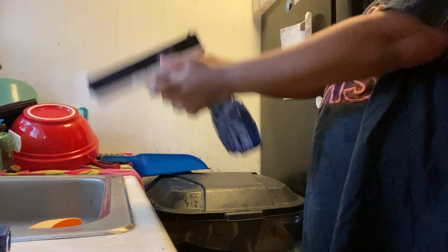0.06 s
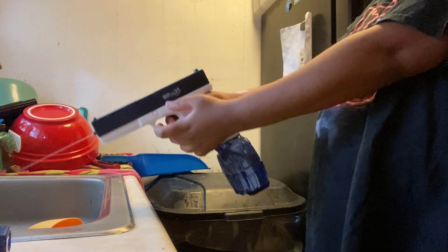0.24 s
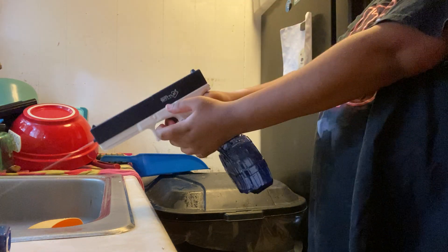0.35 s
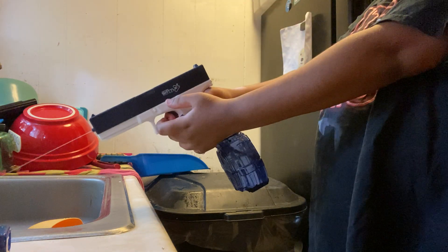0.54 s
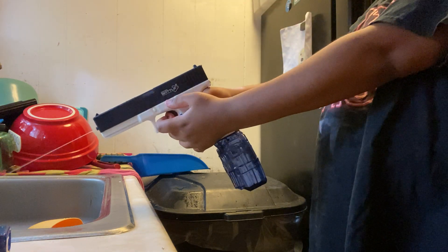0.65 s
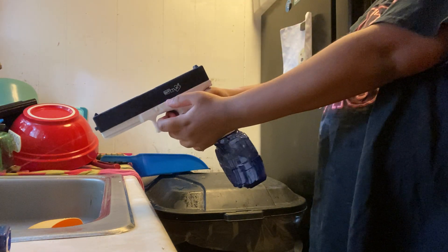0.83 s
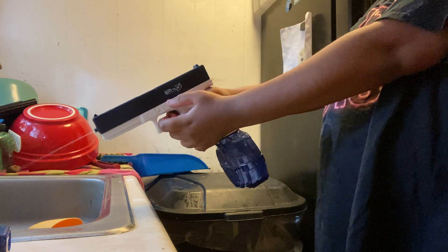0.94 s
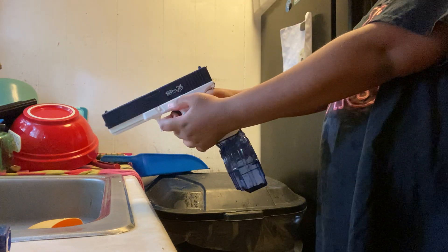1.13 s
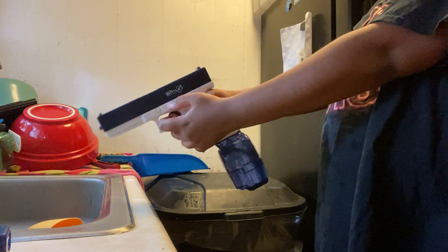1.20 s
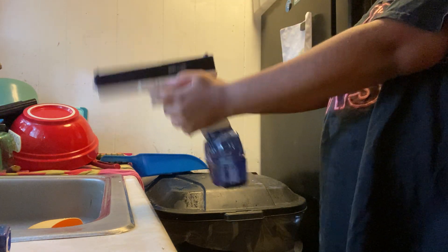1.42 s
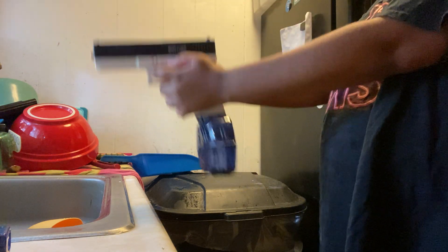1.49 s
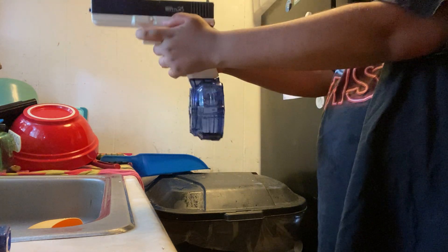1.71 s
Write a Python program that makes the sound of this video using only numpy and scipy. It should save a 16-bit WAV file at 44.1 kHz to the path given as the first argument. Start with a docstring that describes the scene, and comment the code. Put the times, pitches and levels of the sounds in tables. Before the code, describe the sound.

A motorised water pistol clicks, spins up and fires one short burst, its gears whining as rapid thumping spits of spray hit a steel sink. The motor winds down and a drop falls, close by in a small kitchen.

```python
"""A battery water pistol fires one burst into a steel kitchen sink.
The trigger clicks and the motor spins up; its gears whine and chatter, sagging as they cock the spring.
Fourteen times a second the piston lets go with a thump and a spit of spray that excites the sink's modes.
The motor coasts down, the hand shifts on the plastic, a last drop falls,
and the small hard room reverberates over a faint hum."""
import sys
import numpy as np
from scipy import signal
from scipy.fft import rfft, irfft
from scipy.io import wavfile
from scipy.ndimage import uniform_filter1d

SR = 44100
rng = np.random.default_rng(int(sys.argv[2]) if len(sys.argv) > 2 else 0)


def to_wav(s):
    """Save 16-bit WAV."""
    ch = np.atleast_2d(s).T  # columns
    pcm = np.round(np.clip(ch, -1, 1) * 32767)  # PCM
    wavfile.write(sys.argv[1], SR, pcm.astype(np.int16))


N = 77175
TIME_S = np.arange(N) / SR


def undb(db):
    """Decibels to amplitude ratio."""
    return 10 ** (np.asarray(db) / 20)

def unit(x):
    """Normalisation to rms 1."""
    return x / np.sqrt(np.mean(x ** 2))

def per_bin(points):
    """Interpolation of (frequency_hz, value) rows on a log frequency axis."""
    hz, value = np.array(points, float).T
    return np.interp(np.log(np.arange(N + 1) * SR / (2 * N) + 1), np.log(hz), value)

def colour(x, spectrum):
    """Minimum-phase filtering to a spectral shape, at unit power gain."""
    cepstrum = irfft(np.log(unit(undb(per_bin(spectrum)))))
    cepstrum[1:N] *= 2
    cepstrum[N + 1:] = 0
    return irfft(rfft(x, 2 * N) * np.exp(rfft(cepstrum)))[..., :N]

def wander(rate_hz):
    """Smooth random modulation, rms 1."""
    step = int(SR / rate_hz)
    return unit(uniform_filter1d(np.repeat(rng.standard_normal(N // step + 1), step), step)[:N])

def grains(spread_db):
    """Granular noise: dense tiny impacts of uneven size, rms 1."""
    size = np.repeat(np.minimum(rng.exponential(size=N // 8 + 1), 5), 8)[:N]
    return unit(rng.standard_normal(N) * undb(spread_db * size))

def ring(x, hz, t60_s):
    """Forced response of one damped mode, keeping the power of a noisy drive."""
    r = np.exp(-np.log(1000) / (t60_s * SR))
    return signal.lfilter([np.sqrt(2 * (1 - r * r))], [1, -r * np.exp(2j * np.pi * hz / SR)], x).real


# room air spectrum: frequency_hz, density_db
AIR_SPECTRUM = [(20, -13.5), (45, -0.5), (80, 2), (130, -6.5), (200, -13.5), (400, -5.5), (650, -4.5),
                (1000, -7.5), (1500, -9), (2000, -21.5), (2700, -15.5), (3600, -26), (6000, -33),
                (15000, -42)]

def background(air_db=-61, hum_hz=64.4, hum_db=-62.5):
    """Ambient noise: room air and a wavering appliance hum, as mid and side signals."""
    mid, side = undb(air_db) * colour(rng.standard_normal((2, N)), AIR_SPECTRUM)
    pitch_hz = hum_hz * (1 + .03 * wander(12))
    hum = np.sin(2 * np.pi * np.cumsum(pitch_hz) / SR) * undb(hum_db + 2.5 * wander(10))
    return mid + hum, side

def kitchen(x, early_db, early_decay_s=.0039, tail_db=-6, t60_s=.6, treble_t60_s=.33):
    """Reverberation: early reflections off counter and wall, then a tail that loses its treble first."""
    early, low, high = rng.standard_normal((3, N))
    unit_energy = lambda h: h / np.sqrt(np.sum(h ** 2))
    crossover = signal.butter(2, 4500, fs=SR)
    low = signal.filtfilt(*crossover, low) * 1000 ** (-TIME_S / t60_s)
    high = (high - signal.filtfilt(*crossover, high)) * 1000 ** (-TIME_S / treble_t60_s)
    early = unit_energy(early * np.exp(-TIME_S / early_decay_s))
    tail = unit_energy((low + high) * (TIME_S > .006))
    return signal.fftconvolve(x, undb(early_db) * early + undb(tail_db) * tail)[:N]

# likeness of the two channels: frequency_hz, likeness_ratio
COHERENCE = [(100, 0.89), (280, 0.91), (600, 0.26), (1200, 0.48), (2200, .1), (4500, 0.28), (6500, 0.55),
             (8000, 0.94), (15000, 1)]
# level difference: frequency_hz, left_minus_right_db
BALANCE = [(100, 2.5), (450, 2.5), (900, 1), (1300, 0), (1800, -4), (2900, -2), (3700, -1), (4900, 2.5),
           (7000, 0), (15000, -0.5)]
# phase difference: frequency_hz, left_lead_rad
PHASE_LEAD = [(100, 0.36), (280, 0.87), (520, 1.77), (1460, -0.9), (1810, 3), (2670, -1.0), (4650, 0.5),
              (6370, 5.5), (8180, 6.5), (9730, 9), (10900, 9.5), (12500, 12.5), (13700, 13), (14600, 15),
              (15400, 16)]

def microphones(mid, side):
    """Partial coherence: two ports hear partly different reflections, at their own level and phase."""
    alike = np.clip(per_bin(COHERENCE), 0, 1)
    sign = np.array([[1], [-1]])
    pair = rfft(mid, 2 * N) * np.sqrt((1 + alike) / 2) + sign * rfft(side, 2 * N) * np.sqrt((1 - alike) / 2)
    return irfft(pair * undb(sign * per_bin(BALANCE) / 2) * np.exp(.5j * sign * per_bin(PHASE_LEAD)))[:, :N]

def drip(start_s=1.671, pitch_hz=592, glide_hz_per_s=5960, rise_s=.0078, level_db=-43.5):
    """A damped rising chirp: a last drop plops into the sink."""
    age = np.maximum(TIME_S - start_s, 0)
    envelope = age / rise_s * np.exp(1 - age / rise_s)
    return undb(level_db) * envelope * np.sin(2 * np.pi * (pitch_hz + glide_hz_per_s * age / 2) * age)

# bright tick spectrum: frequency_hz, density_db
TICK_SPECTRUM = [(150, -9), (400, -5.5), (1500, 3), (4200, 0.5), (7000, -11), (15000, -18)]
# clicks of trigger, gears taking up and grip: start_s, level_db, resonance_hz, decay_s, tick_db
PLASTIC_CLICKS = [(.133, -42.5, 1150, 0.0046, -3.5), (.143, -51.5, 261, 0.0089, -21),
                  (.158, -42, 900, 0.0024, 2), (.184, -37.5, 950, 0.0045, -16),
                  (.195, -28.5, 1146, 0.0056, -15), (.205, -29, 1280, 0.0037, -9),
                  (.208, -37, 448, 0.011, -25), (.217, -41, 1400, 0.0025, 7), (1.475, -41, 480, .004, -7),
                  (1.671, -49.5, 1200, 0.0043, -20.5), (1.744, -41.5, 1250, .006, -26)]

def clicks(relative_bandwidth=.41):
    """Impact excitation: each contact drives a heavily damped plastic resonance and a bright tick."""
    out = 0
    for start, db, hz, decay, tick_db in PLASTIC_CLICKS:
        age = TIME_S - start
        force = undb(db) * (age > 0) * np.exp(-np.abs(age) / decay) * rng.standard_normal(N)
        drive = signal.sosfilt(signal.butter(2, (hz / 2, 2 * hz), "band", fs=SR, output="sos"), force)
        t60_s = np.log(1000) / (np.pi * relative_bandwidth * hz)
        out = out + ring(drive, hz, t60_s) + undb(tick_db) * colour(force, TICK_SPECTRUM)
    return out

# pump strokes: start_s, spray_db, thump_db, clack_db, sink_db
PUMP_STROKES = [(.269, -2, 3.5, -2.5, -12), (.342, 1, -5, -5, -16), (.415, 1, -7, -5, -17),
                (.485, -1.5, -1, 1.5, -9.5), (.558, 1, 1, 1, -10.5), (.628, -1.5, 4.5, -3, 0.5),
                (.703, 2, 0, 2.5, -5), (.774, -0.5, -3.5, 3, -12.5), (.846, 0.5, 3, -0.5, -4),
                (.917, -6.5, -10, -3, -15), (.990, -0.5, -9.5, -3.5, -14), (1.060, 2, 1.5, 5.5, 3.5),
                (1.133, 0.5, 4, 1.5, -9), (1.203, 1.5, 3.5, 4, -2), (1.275, -9.5, -10, -8, -11),
                (1.345, -1, 3, -9.5, 1)]
SPRAY_COLUMN, THUMP_COLUMN, CLACK_COLUMN, SINK_COLUMN = 1, 2, 3, 4

def bursts(column, gain_db, ramp_s, hold_s, decay_s, spread_db):
    """Incoherent summation: the showers of impacts from successive strokes add in power."""
    power = 0
    for stroke in PUMP_STROKES:
        age = TIME_S - stroke[0]
        envelope = np.clip(age / ramp_s, 0, 1) * np.exp(-np.maximum(age - hold_s, 0) / decay_s)
        power = power + (undb(stroke[column]) * envelope) ** 2
    return undb(gain_db) * np.sqrt(power) * grains(spread_db)

def pump_cycle():
    """Phase from one stroke to the next, 0 to 1; zero before the first and after the last."""
    starts = np.array(PUMP_STROKES)[:, 0]
    return np.interp(TIME_S, starts, np.arange(len(starts))) % 1

# steel basin modes: pitch_hz, level_db, t60_s, left_minus_right_db
SINK_MODES = [(222, -6, 0.21, 4), (279.5, -5, .3, 0.5), (368.2, -4, 0.67, 4), (471, 2, .42, 6),
              (786, -7.5, .3, 1.5), (893, -4, .4, 4.5), (1087, -4, .45, 0), (1330, 5, .35, 3.5),
              (1470, -2, .25, -3), (2243, -7, .3, -1), (2580, -11, .75, 0.5)]

def sink():
    """Modal superposition: slugs of water drum on the basin, which radiates little deep bass."""
    water = bursts(SINK_COLUMN, gain_db=-39, ramp_s=.002, hold_s=.0181, decay_s=.0132, spread_db=1)
    water = signal.sosfilt(signal.butter(4, 170, "high", fs=SR, output="sos"), water)
    return sum(ring(water, hz, t60) * undb(db + np.array([[pan], [-pan]]) / 2)
               for hz, db, t60, pan in SINK_MODES)

GEAR_SPREAD_DB = 1.96
# squeals while the motor is slow under load: start_s, length_s, level_db
GEAR_SQUEALS = [(0.217, 0.049, -34.5), (1.332, .016, -32)]

def squeal(pitch_hz=4720, t60_s=.0041):
    """Resonance: a rough drive excites one shrill mode of the gear train."""
    level = sum(undb(db) * (np.abs(TIME_S - start - length / 2) < length / 2)
                for start, length, db in GEAR_SQUEALS)
    return ring(uniform_filter1d(level, size=200) * grains(GEAR_SPREAD_DB), pitch_hz, t60_s)

# motor run: time_s, shaft_hz, chatter_db, whine_db
MOTOR_RUN = [(.18, 60, -40, -35), (.197, 115.6, -11.5, -13), (.222, 160, -4.5, -6), (.255, 225, -4.5, -6),
             (.275, 282, -0.5, -1.5), (.31, 291, 0, -1), (.54, 288, 0.5, 1), (.80, 291, 0, -1),
             (1.315, 291, -.5, -0.5), (1.335, 264, -1.5, 1), (1.36, 215, -1.5, -1), (1.39, 172, -5, -6.5),
             (1.44, 128, -15.5, -6.5), (1.47, 88, -18.5, -10), (1.56, 45, -37, -22), (1.62, 32, -46, -31)]
# spring loading: cycle_fraction, speed_change_fraction
SPEED_SAG = [(0, -.05), (.13, -.003), (.45, .005), (.63, .04), (.82, -.01), (1, -.05)]
# whine partials: shaft_harmonic, free_db, cocking_db
WHINE_PARTIALS = [(1, -8, -6.5), (2, -16.5, -20.5), (3, -6, -2.5), (4, -1.5, -14.5), (5, -10, -22),
                  (9, -8.5, -15), (10, -3.5, 1.5), (17, -8.5, -7)]
# gear housing response: frequency_hz, gain_db
HOUSING_RESPONSE = [(120, -41.5), (220, -19), (280, -1), (370, 0), (460, 4.5), (620, 0.5), (780, -3),
                    (900, -5), (1150, 5), (1350, 2.5), (1900, -8), (2300, -4.5), (2850, 0), (3300, -11.5),
                    (4400, -8), (4900, -1), (5500, -9.5), (7000, -17)]
# gear chatter spectrum: frequency_hz, density_db
CHATTER_SPECTRUM = [(100, -45), (200, -26), (420, -7.5), (560, -9), (750, -11.5), (1000, -6.5), (1270, 1.5),
                    (1500, -1.5), (1850, -6.5), (2850, 0), (3600, -5.5), (4300, -.5), (4850, 3.5),
                    (5200, -2.5), (5600, -1.5), (7000, -6.5), (8400, -2), (9500, -11.5), (15000, -14)]

def gearbox(whine_gain_db=-44, chatter_gain_db=-31.5, wobble=.009, flutter_db=2.3, decay_turns=1.06):
    """Periodic forcing: gears whine at shaft harmonics and chatter once a turn, slowed by the spring."""
    cycle = pump_cycle()
    times, shaft_hz, chatter_db, whine_db = np.array(MOTOR_RUN).T
    sag = np.interp(cycle, *np.array(SPEED_SAG).T)
    turns = np.cumsum(np.interp(TIME_S, times, shaft_hz) * (1 + sag + wobble * wander(150))) / SR
    envelope = lambda db: undb(np.interp(TIME_S, times, db)) * (TIME_S > times[0]) * (TIME_S < times[-1])
    cocking = np.clip((cycle - .54) / .079, 0, 1)  # the spring is picked up just past mid-cycle
    load = uniform_filter1d(cocking + (cycle == 0), size=300)  # also loaded while starting and stopping
    whine = 0
    for harmonic, free_db, cocking_db in WHINE_PARTIALS:
        level = undb(free_db + load * (cocking_db - free_db) + flutter_db * wander(60.02))
        whine = whine + level * np.sin(2 * np.pi * (harmonic * turns + rng.random()))
    chatter = unit(grains(GEAR_SPREAD_DB) * np.exp(-(turns % 1) / decay_turns))
    return (undb(whine_gain_db) * colour(whine * envelope(whine_db), HOUSING_RESPONSE),
            undb(chatter_gain_db) * colour(chatter * envelope(chatter_db), CHATTER_SPECTRUM))

# piston squeak: cycle_fraction, pitch_hz, level_db
SQUEAK_GLIDE = [(.52, 1340, -30.5), (.6, 1306, -4.5), (.7, 1196, -1.5), (.82, 1125, 1), (.96, 1062, 3),
                (1, 1059, -6)]

def piston_squeak(gain_db=-35, wobble=.0119, flutter_db=2.5):
    """Frequency modulation: a squeak glides down each time the piston is pulled back."""
    cycle = pump_cycle()
    fraction, hz, db = np.array(SQUEAK_GLIDE).T
    pitch_hz = np.interp(cycle, fraction, hz) * (1 + wobble * wander(200))
    level = uniform_filter1d(undb(np.interp(cycle, fraction, db)) * (cycle > fraction[0]), size=150)
    return undb(gain_db + flutter_db * wander(80)) * level * np.sin(2 * np.pi * np.cumsum(pitch_hz) / SR)

# pump cylinder modes: pitch_hz, level_db, decay_s
CYLINDER_MODES = [(166, -11.5, 0.014), (221.7, 0.5, 0.023), (469.8, -2, .034), (603, -3.5, .02)]

def piston_knocks(gain_db=-33, rise_s=.012, detune=.02):
    """Free vibration: the piston drives home and the cylinder rings, slightly detuned each time."""
    out = 0
    for start, _, thump_db, *_ in PUMP_STROKES:
        age = np.maximum(TIME_S - start, 0)
        onset = undb(gain_db + thump_db) * (1 - np.exp(-age / rise_s))
        for hz, db, decay in CYLINDER_MODES:
            pitch_hz = hz * (1 + detune * rng.standard_normal())
            out = out + onset * undb(db) * np.exp(-age / decay) * np.sin(2 * np.pi * pitch_hz * age)
    return out

# spectra of spray, piston thump and shell clack: frequency_hz, density_db
SPRAY_SPECTRUM = [(100, -42), (300, -15.5), (600, -2.5), (1200, -1), (2000, 0.5), (3500, -2.5), (6000, 0.5),
                  (7000, -1), (8500, -0.5), (9500, -4), (13000, -4.5), (15500, -5)]
THUMP_SPECTRUM = [(40, -48.5), (100, -23), (145, -8), (180, -7), (220, 0.5), (255, -0.5), (285, -2.5),
                  (340, -11), (560, -3), (900, -14.5), (2000, -37)]
CLACK_SPECTRUM = [(500, -26), (800, -7), (950, -8.5), (1100, 0), (1480, 0.5), (1850, -10.5), (2700, -8.5),
                  (4000, -24.5)]

def pump():
    """Source and filter: each stroke spits spray, thumps the cylinder and rattles the plastic shell."""
    spray = bursts(SPRAY_COLUMN, gain_db=-27, ramp_s=.006, hold_s=.021, decay_s=.0109, spread_db=2.5)
    thump = bursts(THUMP_COLUMN, gain_db=-41.5, ramp_s=.003, hold_s=.0368, decay_s=.0361, spread_db=1.4)
    clack = bursts(CLACK_COLUMN, gain_db=-35.5, ramp_s=.1, hold_s=.0162, decay_s=.01, spread_db=2)
    return colour(spray, SPRAY_SPECTRUM) + colour(thump, THUMP_SPECTRUM) + colour(clack, CLACK_SPECTRUM)

def scene():
    """Superposition of the pistol's direct sound, its reflections, the background and the sink."""
    whine, chatter = gearbox()
    clatter = chatter + squeal() + pump() + clicks()
    tones = whine + piston_squeak() + piston_knocks() + drip()
    into_room = clatter + undb(-7) * tones
    air_mid, air_side = background()
    mid = undb(-.66) * (clatter + tones + kitchen(into_room, early_db=-14)) + air_mid
    side = undb(1.5) * kitchen(into_room, early_db=-2.5) + air_side
    return microphones(mid, side) + sink()

def record(dry, cutoff_hz=15400):
    """Band limiting: the phone's steep low-pass filter cuts the highest treble."""
    return signal.sosfilt(signal.ellip(10, .2, 80, cutoff_hz, fs=SR, output="sos"), dry)


dry = scene()
out = record(dry)
to_wav(out)
```